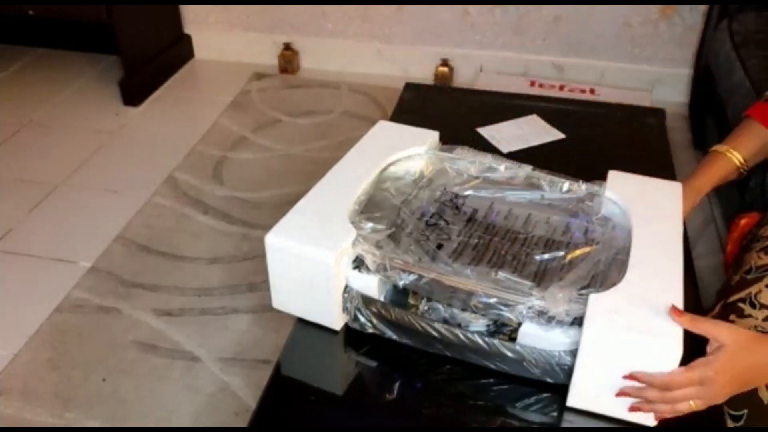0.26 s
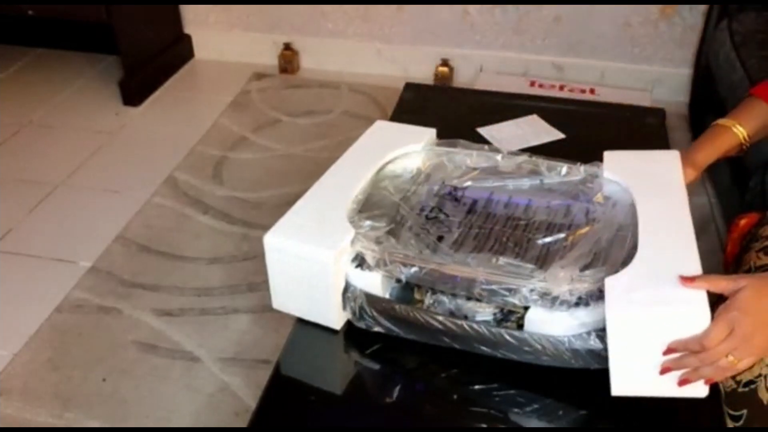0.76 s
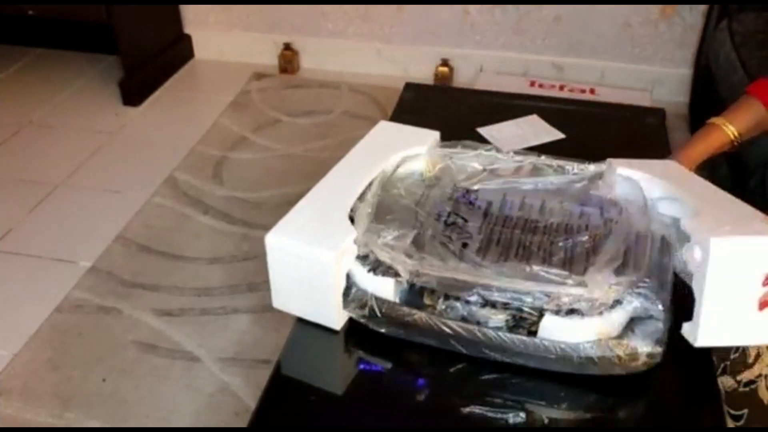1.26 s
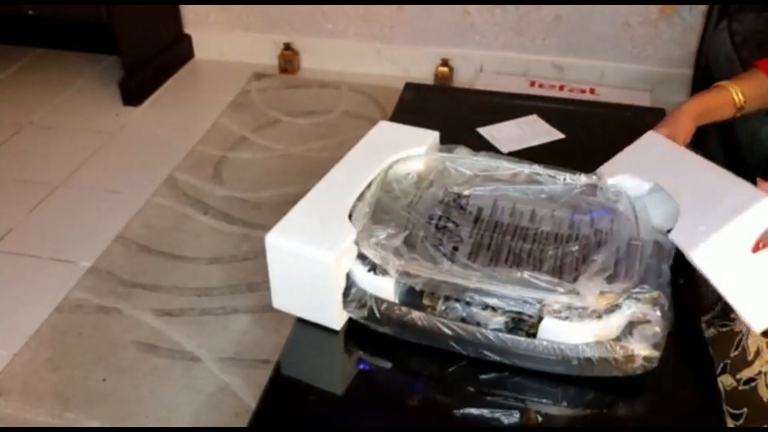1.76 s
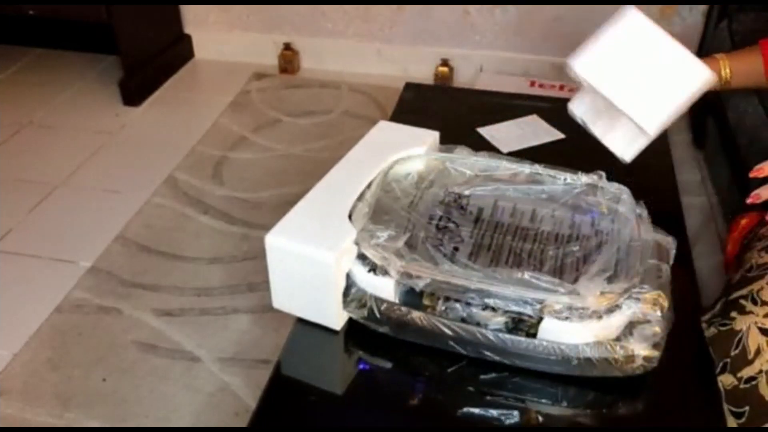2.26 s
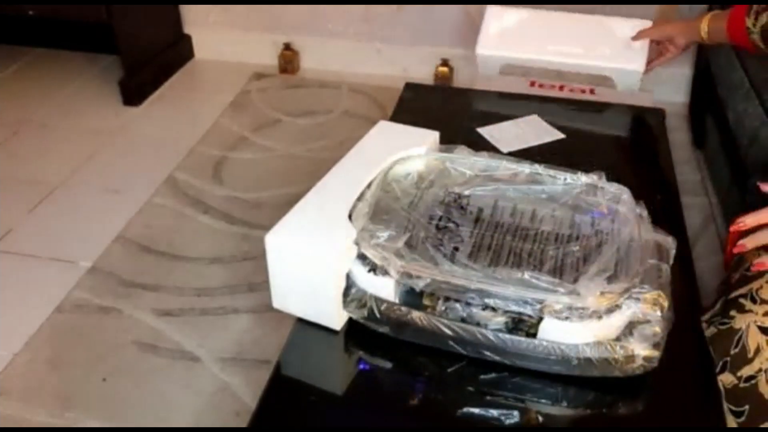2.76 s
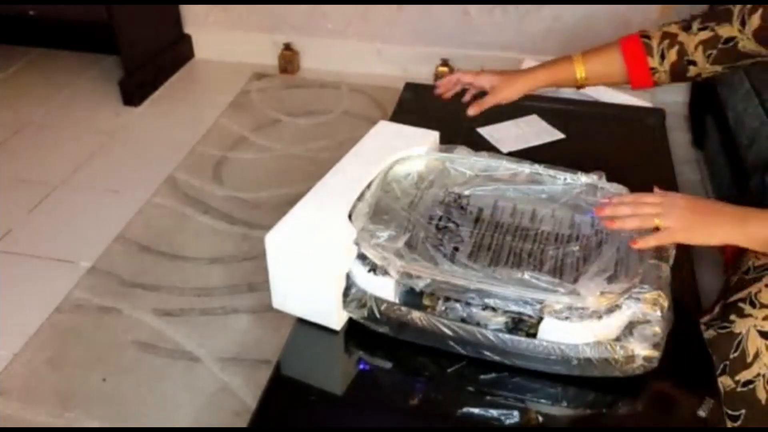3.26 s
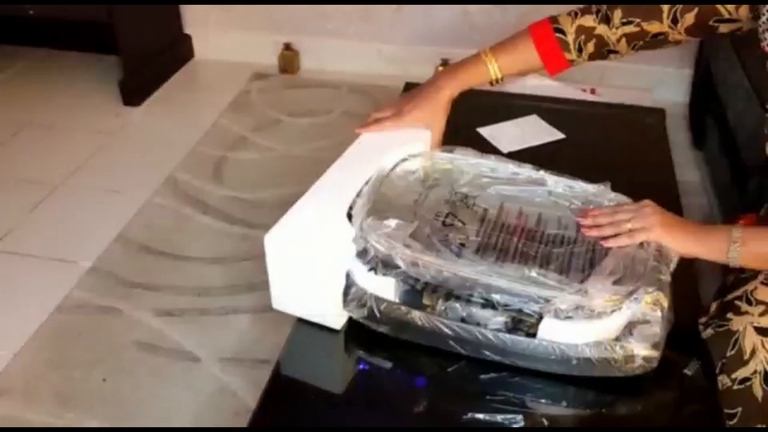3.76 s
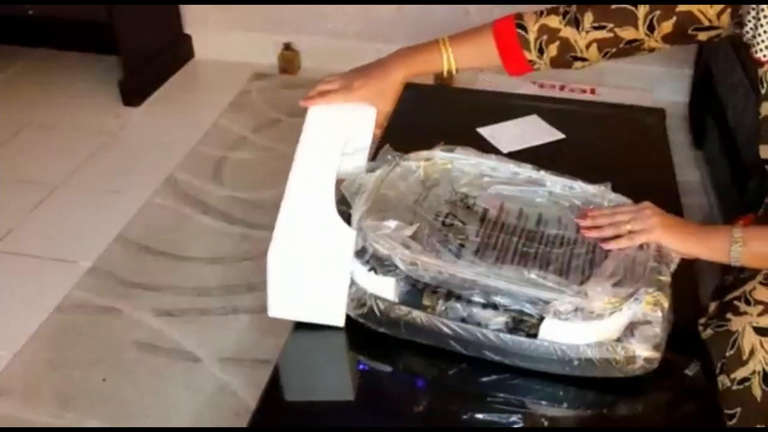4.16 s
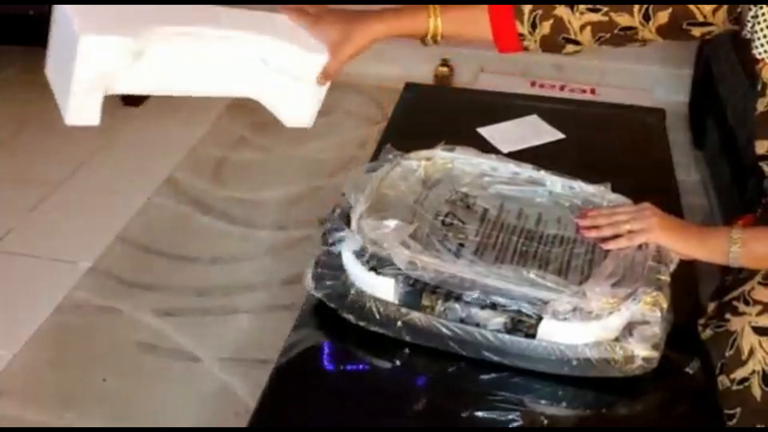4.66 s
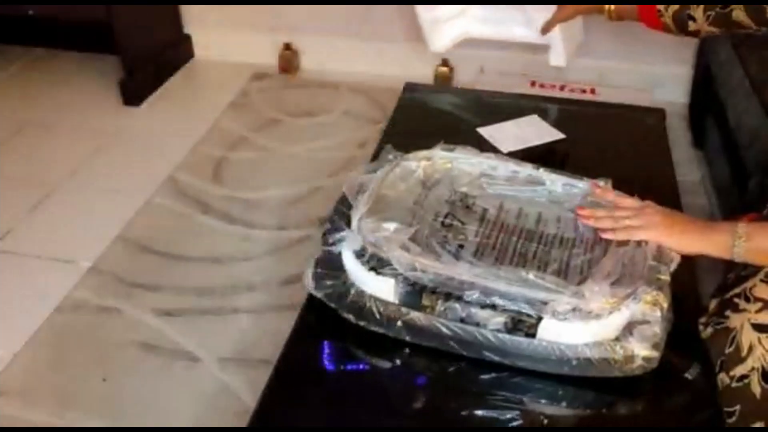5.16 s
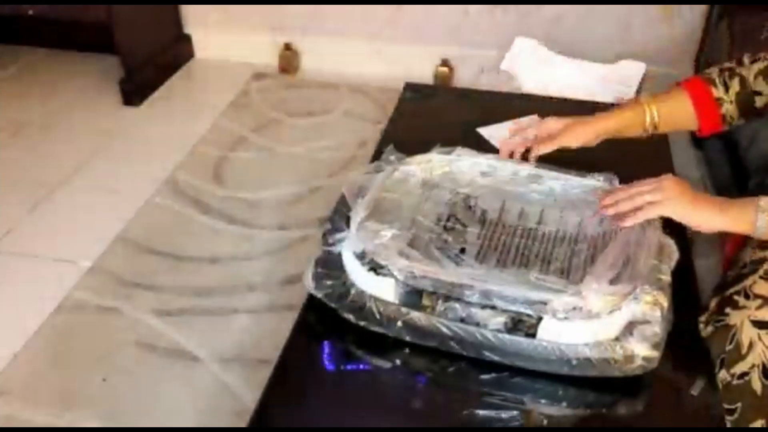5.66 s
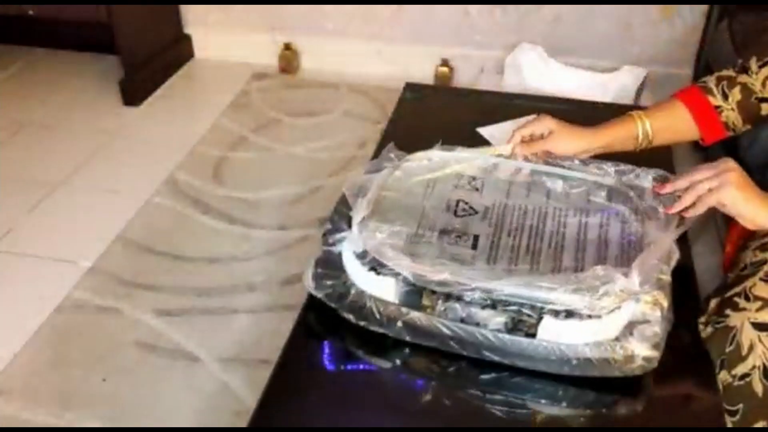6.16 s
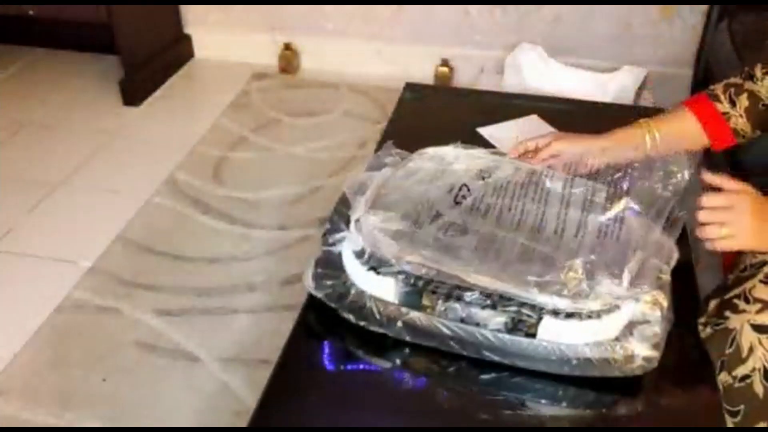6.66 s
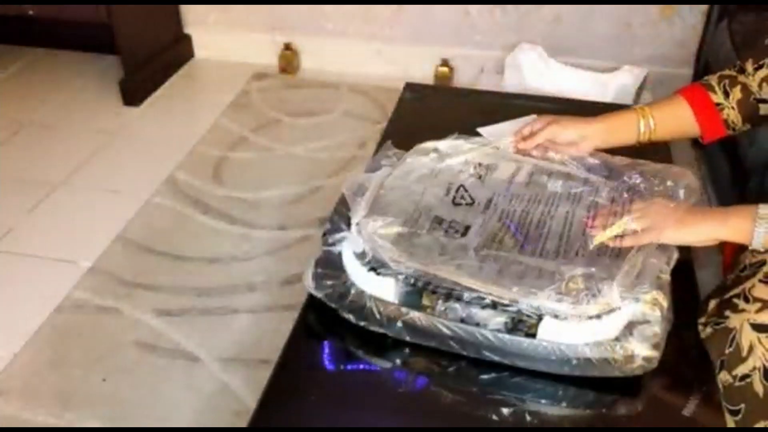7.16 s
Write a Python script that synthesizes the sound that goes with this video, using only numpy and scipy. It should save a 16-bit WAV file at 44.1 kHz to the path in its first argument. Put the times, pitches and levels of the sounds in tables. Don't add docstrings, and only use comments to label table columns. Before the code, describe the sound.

In a hard tiled room with a faint distant motor hum, hands tug a foam block from a plastic-wrapped appliance with light crackles, a tiny squeak and sharp snaps. It drops with a hollow knock and small bounces. A second block comes off with harder tugs, lands louder, then the loose wrap rustles. Close stereo pickup, top end cut.

```python
import sys
import numpy as np
from scipy import signal
from scipy.fft import rfft, irfft
from scipy.io import wavfile

SR = 44100
rng = np.random.default_rng(int(sys.argv[2]) if len(sys.argv) > 2 else 0)


def boost(x):
    u = np.asarray(x, float) / 20
    return 10 ** u


def transcribe(u):
    v = np.clip(np.atleast_2d(u).T, -1, 1)
    q = np.round(v * 32767).astype(np.int16)
    wavfile.write(sys.argv[1], SR, q)


N = 327222

# f/Hz, level/dB
AIR_COLOUR = [(15, -30), (25, 5.5), (56, -5.5), (97, -9), (157, -5), (201, -7.5), (271, 8), (334, -12.5),
              (579, -8), (728, -13.5), (1260, -20), (4350, -32.5), (6000, -94), (7800, -19), (13200, -120)]
AIR_DB = -48
# f/Hz, level/dB rms
MOTOR_TONES = [(47.5, -56.5), (95, -65.5), (142, -68), (190, -60)]
# f/Hz, likeness/0..1
PORT_LIKENESS = [(60, 0.91), (250, 0.94), (600, 0.54), (1400, 0.043), (3000, 0.043), (7000, 0.6),
                 (14000, 0.97)]
# f/Hz, t60/s
ROOM_FADE = [(60, 0.87), (200, 0.46), (500, 0.51), (1500, 0.47), (4000, 0.41), (8000, 0.39), (14000, 0.27)]
# t/s, hold/s, crackle level/dB, rub level/dB, crackle brightness/dB
RIGHT_PULLS = [(0.189, .03, -53.5, -57, -7), (.255, 0.025, -51.5, -57, -5), (0.335, 0.025, -53, -71, -1),
               (0.457, 0.2, -57, -62.5, -5), (0.577, 0.033, -50.5, -55.5, -4),
               (0.666, 0.23, -62.5, -62.5, 0), (0.865, 0.034, -53, -55, -7), (0.997, .02, -55, -53.5, -4),
               (1.018, 0.17, -49, -54, -8), (1.165, .02, -46, -45.5, 0), (1.194, 0.037, -46.5, -42.5, 1),
               (1.243, 0.085, -45, -49, -7), (1.36, 0.23, -52.5, -53.5, -1.5),
               (1.633, 0.17, -48.5, -55, -1.5), (1.79, 0.071, -41, -51, -4), (1.991, 0.039, -67, -56, 1),
               (2.07, 0.15, -63, -66, -5), (2.186, 0.087, -54, -58, -10), (2.372, 0.16, -57.5, -60, -4),
               (2.766, .02, -54, -62, -11), (2.796, 0.058, -50, -61.5, -12), (3.012, .06, -59, -54, 2.5),
               (3.11, 0.045, -52.5, -53, 2.5), (3.2, 0.03, -54, -59, -2)]
LEFT_PULLS = [(3.542, 0.16, -58.5, -63.5, -2), (3.68, 0.05, -48.5, -50, -0.5), (3.78, 0.25, -51, -59, -8),
              (3.923, 0.064, -31.5, -37, -9.5), (4.079, 0.082, -42.5, -46, -4.5),
              (4.241, 0.057, -35, -42, -10), (4.326, 0.043, -32.5, -40.5, -10),
              (4.4, 0.098, -39, -46.5, -10.5), (4.54, 0.056, -38.5, -43, -22),
              (4.65, 0.041, -50.5, -55, -8), (4.883, 0.33, -58.5, -58.5, -2), (5.1, 0.1, -53.5, -59, -3),
              (5.215, 0.039, -45.5, -53, -6), (5.42, 0.095, -51, -63, -5),
              (5.511, 0.017, -37.5, -32.5, -14), (5.6, 0.12, -53, -51, -6), (5.72, .1, -55.5, -58, -7)]
WRAP_PULLS = [(5.842, .17, -45, -53, -7), (6.03, .13, -46, -54, -6.5), (6.19, .1, -52, -56, -6),
              (6.31, 0.015, -43, -53.5, -21), (6.37, .13, -45.5, -56, -10.5),
              (6.569, 0.13, -47.5, -57.5, -6.5), (6.74, 0.12, -57.5, -67, -16), (6.9, .2, -59.5, -66, -13),
              (7.1, 0.086, -52.5, -61.5, -14), (7.18, 0.038, -47, -56.5, -14),
              (7.291, 0.17, -50.5, -62, -5.5)]
# f/Hz, level/dB per Hz
RUB_COLOUR = [(150, -36), (250, -16.5), (383, -7.5), (418, -13), (726, -14.5), (968, 9), (1070, -11.5),
              (5000, -21), (6500, -49), (11000, -120)]
# f/Hz, level/dB per Hz
WRAP_COLOUR = [(880, -32), (1500, -25.5), (3170, 6), (5470, -7), (7220, 0), (9900, -7), (13700, 4),
               (14800, -9)]
# t/s, peak level/dB, centre f/Hz
CREASE_SNAPS = [(0.1842, -35.5, 7850), (0.868, -42, 6740), (0.9043, -38.5, 10800), (0.9787, -29.5, 6700),
                (1.121, -36.5, 7240), (1.178, -37, 6970), (1.2692, -29, 5000), (1.569, -47, 6820),
                (1.798, -20, 8860), (1.8012, -18, 13100), (1.8108, -20, 13600), (2.001, -43, 3830),
                (2.203, -39, 7040), (2.375, -52, 3630), (3.5477, -48, 6940), (3.861, -31.5, 7570),
                (3.925, -20, 3500), (4.082, -29, 3400), (4.2454, -29, 3400), (4.884, -42.5, 7570),
                (5.103, -36, 7100), (5.157, -37.5, 7010), (5.8748, -31.5, 7260), (5.921, -30.5, 7750),
                (6.201, -34, 7390), (6.312, -31, 8500), (6.613, -39, 7420), (6.903, -43, 7770),
                (7.1015, -48, 3200), (7.1985, -39, 6500)]
# t/s, f/Hz, level/dB
SQUEAK_PATH = [
    (.539, 5800, -53),
    (.546, 6030, -42),
    (.552, 6660, -40.5),
    (.562, 6930, -29),
    (.569, 7880, -32),
    (.578, 8940, -38),
    (.584, 9000, -64),
]
# t/s, peak level/dB, thud f/Hz, bright edge level/dB, ring level/dB
FOAM_BUMPS = [
    (0.278, -43.5, 657, -21, -22),
    (1.2, -30.5, 237, -24, -9.5),
    (1.268, -35.5, 400, -27, -22),
    (1.826, -30, 330, -16, -9),
    (1.881, -41, 285, 7.5, -9),
    (3.68, -47, 210, -21, -23),
    (3.893, -23.5, 227, -9, -4.5),
    (4.298, -22, 215, -19, -5.5),
    (7.389, -40, 460, 3, -19),
]
FIRST_FALL = [
    (3.009, -22, 220, -36, -5),
    (3.033, -22, 256, -37, -12),
    (3.094, -14, 397, -38, 5.5),
    (3.174, -33, 330, -29, 1.5),
    (3.234, -34, 335, -25, 0),
]
SECOND_FALL = [
    (5.463, -23.5, 226, -23, 0.5),
    (5.509, -10.5, 348, -3.5, -1.5),
    (5.564, -25, 294, -25, -5),
    (5.609, -22.5, 336, -30, -0.5),
    (5.833, -23.5, 560, -12, -5),
    (5.898, -34, 376, -13, -8),
]
# f/Hz, level/dB, t60/s
FIRST_TONES = [(58, -19, 0.15), (92.7, -15, 0.24), (153.6, -5.5, 0.088), (205, -18, 0.25),
               (322.3, 1.5, 0.23), (366.4, -1, 0.21), (479.6, 2, 0.18), (557, 2, 0.083), (634.4, 0.5, 0.15),
               (702.4, 2, 0.13), (774, -1.5, 0.14)]
# f/Hz, level/dB, t60/s
SECOND_TONES = [(90.5, -11, 0.18), (156.7, -3.5, 0.19), (202.3, 0.5, 0.15), (329, -2, 0.25),
                (382, -7.5, 0.28), (470.7, -8.5, 0.18), (651, 6, 0.052), (664, -10, 0.13),
                (906, 7.5, 0.064), (1166, -8, 0.13), (1320, -24, .08)]
# t/s, delay/samples
LEFT_DELAY = [
    (0, 7),
    (2.4, 7),
    (3.3, 5),
    (3.6, -1),
    (4.8, -5),
    (5.2, 4),
    (5.5, 7),
    (6.1, 4),
    (7.42, 4),
]
# f/Hz, level/dB
PORT_BALANCE = [(60, 3), (110, -1), (200, 0.5), (370, 0.0), (690, 0.0), (1270, 0), (2330, -0.5), (4290, 1),
                (7890, -1.5), (14500, -3.5)]
# f/Hz, level/dB
CAPSULE_TONE = [(20, -16), (40, 2.5), (5000, -1), (6500, 2.5), (8300, -0.5), (8900, -5), (11000, -2.5),
                (14250, 3), (14500, -27), (14900, -48), (15100, -85)]

ATTACK_DB_PER_S, RELEASE_DB_PER_S = 800, 143
RISE_S = .008
REST_CRACKLE_DB, REST_RUB_DB = -79, -71
SPLIT_HZ = 8700
SNAP_SIDE_DB = 3
CONTACT_S, CONTACT_DOUBLES_DB = .016, 22


def rms_one(x):
    return x / np.sqrt(np.mean(x ** 2) + 1e-20)


def in_time(rows):
    s, *columns = np.transpose(rows)
    return [np.interp(np.arange(N) / SR, s, c) for c in columns]


def at_hz(points, hz):
    table_hz, values = np.array(points).T[:2]
    return np.interp(np.log(hz), np.log(table_hz), values)


def drift(rate):
    r = np.exp(-80 * np.pi * rate / SR)
    white = rng.standard_normal(N // 40 + 2002)
    slow = signal.lfilter([1], [1, -2 * r, r * r], white)[2000:]
    return np.interp(np.arange(N) / 40, np.arange(len(slow)), rms_one(slow))


def patches(rate):
    return 2.0 * drift(rate)


def passed(x, hz, kind, order=2):
    return signal.sosfilt(signal.butter(order, hz, kind, fs=SR, output="sos"), x)


def ring(x, hz, t60):
    r = boost(-60 / (t60 * SR))
    w = 2 * np.pi * hz / SR
    return signal.lfilter([0, np.sin(w)], [1, -2 * r * np.cos(w), r * r], x)


def bands(white, low_hz, gain):
    out = 0
    edges = low_hz * 2 ** np.arange(0, np.log2(20000 / low_hz), .5)
    for k, (low, high) in enumerate(zip(edges, edges[1:])):
        centre = np.sqrt(low * high)
        mid, side = passed(white[k % 2], [low, high], "band")
        alike = np.clip(at_hz(PORT_LIKENESS, centre), 0, 1)
        both = np.sqrt(1 + alike) * mid + np.sqrt(1 - alike) * side * [[1], [-1]]
        out = out + gain(centre) * both
    return rms_one(out)


def grains(per_s, spread_db, smooth):
    sizes = boost(spread_db * np.minimum(rng.exponential(1, (2, 2, N)), 4))
    white = rng.standard_normal((2, 2, N))
    happens = rng.random(N) < per_s * boost(4.0 * drift(15)) / SR
    return smooth * white + rms_one(sizes * np.sign(white) * happens)


def background():
    white = rng.standard_normal((2, 2, N))
    air = bands(white, 23.0, lambda hz: boost(at_hz(AIR_COLOUR, hz) + 0.33 * drift(9.6)) * (hz < 8000))
    turn = np.cumsum(1 + 0.00987 * drift(2.97)) / SR
    hum = sum(boost(db + 1 + patches(7.6)) * np.sin(2 * np.pi * hz * turn) for hz, db in MOTOR_TONES)
    return boost(AIR_DB - 5.5) * air + hum


def room(x):
    t = np.arange(SR) / SR
    white = rng.standard_normal((2, 2, SR))
    tail = bands(white, 40, lambda hz: boost(-60 * t / at_hz(ROOM_FADE, hz)))
    tail = rms_one(tail * (1 - np.exp(-t / 0.00067))) / np.sqrt(SR)
    return signal.fftconvolve(x[None], tail, axes=1)[:, :N]


def handling():
    t = np.arange(0, N + 64, 64) / SR
    pulls = RIGHT_PULLS + LEFT_PULLS + WRAP_PULLS
    s, hold, crackle_db, rub_db, bright_db = np.transpose(pulls)[..., None]
    rise_db = np.minimum(ATTACK_DB_PER_S * (t - s - RISE_S), 0)
    fall_db = RELEASE_DB_PER_S * np.maximum(t - s - hold, 0)
    layers = [(crackle_db, REST_CRACKLE_DB),
              (crackle_db + bright_db, REST_CRACKLE_DB + 1.0),
              (rub_db, REST_RUB_DB)]
    gains = []
    for db, rest_db in layers:
        power = (boost(db + rise_db - fall_db) ** 2).sum(axis=0) + boost(rest_db) ** 2
        gains.append(np.interp(np.arange(N) / SR, t, np.sqrt(power)))
    return gains


def foam_rub(strength):
    clicks = grains(600, 5.8, smooth=2.0)
    rub = bands(clicks, 230.0, lambda hz: boost(at_hz(RUB_COLOUR, hz) + patches(10.1)) * (hz < 6000))
    return strength * rub


def wrap_crackle(strength, bright):
    clicks = grains(1300, 8.2, smooth=2.7)
    wrap = bands(clicks, 1161, lambda hz: boost(at_hz(WRAP_COLOUR, hz) + patches(22.4)))
    body = passed(wrap, SPLIT_HZ, "low", order=4)
    top = passed(wrap, SPLIT_HZ, "high", order=4)
    return strength * body + boost(1.5) * bright * top


def snaps():
    out, t = np.zeros((2, N + SR)), np.arange(2000) / SR
    sides = SNAP_SIDE_DB * np.array([[-1], [1]])
    for s, db, hz in CREASE_SNAPS:
        burst = rng.standard_normal(len(t)) * np.exp(-t / .0015)
        click = passed(burst, [hz / 1.9, min(hz * 2.1, 20000)], "band", order=1)
        start = round(s * SR)
        out[:, start:start + len(t)] += boost(db - 3 + sides) * click / abs(click).max()
    return out[:, :N]


def squeak():
    hz, db = in_time(SQUEAK_PATH)
    t, out = np.arange(N) / SR, 0
    for spot, spot_db in [(1, -2), (.93, -8), (1.1, -4.5)]:
        phase = 2 * np.pi * np.cumsum(spot * hz * (1 + .018 * drift(400))) / SR
        grip = boost(db + spot_db + 4.5 * drift(300))
        out = out + grip * (np.sin(phase) + boost(-2.5) * np.sin(2 * phase))
    return out * ((t > SQUEAK_PATH[0][0]) & (t < SQUEAK_PATH[-1][0]))


def knocks(rows, tones):
    out, t = np.zeros(N + SR), np.arange(SR // 2) / SR
    for s, db, thud_hz, edge_db, ring_db in rows:
        contact = CONTACT_S * 2 ** ((db + 21) / CONTACT_DOUBLES_DB)
        crush = rng.standard_normal(len(t))
        shape = np.exp(-t / np.clip(contact, .002, .08)) * (1 - np.exp(-t / .004))
        thud = passed(crush * shape, [thud_hz / 2.33, thud_hz * 1.8], "band")
        push = passed((t == 0) * 1., 1.38 * thud_hz, "low")
        rung = sum(boost(tone_db) * ring(push, hz, t60) for hz, tone_db, t60 in tones)
        rung = rung * (1 - np.exp(-t / 0.0088))
        edge = passed(crush * np.exp(-t / .011), 750, "high")
        edge = passed(edge, 1600, "low", order=3)
        hit = thud / abs(thud).max()
        hit = hit + boost(ring_db) * rung / abs(rung).max()
        hit = hit + boost(edge_db) * edge / abs(edge).max()
        start = round(s * SR)
        out[start:start + len(t)] += boost(db - 2.5) * hit
    return out[:N]


def scene():
    crackle, bright, rubbing = handling()
    wrap = wrap_crackle(crackle, bright)
    rub = foam_rub(rubbing)
    ticks, whistle = snaps(), squeak()
    hits = knocks(FOAM_BUMPS, SECOND_TONES)
    hits = hits + knocks(FIRST_FALL, FIRST_TONES) + knocks(SECOND_FALL, SECOND_TONES)
    wet = room(boost(1.5) * hits + boost(5.5) * ticks.mean(axis=0) + boost(-5.0) * whistle)
    near = boost(1.0) * hits + boost(4.0) * ticks + whistle * boost(np.array([[-2.5], [-1.5]]))
    return near + wet + boost(-2.5) * wrap + boost(4.0) * rub + background()


def top_cut(x):
    return signal.sosfilt(signal.butter(12, 15110, fs=SR, output="sos"), x)


def record(dry):
    hz = np.arange(N // 2 + 1) * SR / N + 1
    tilt = boost(at_hz(PORT_BALANCE, hz) / 2)
    tone = rfft(dry) * boost(at_hz(CAPSULE_TONE, hz)) * [tilt, 1 / tilt]
    lower = 1 / (1 + (hz / 4600) ** 6)
    low = irfft(tone * lower, N)
    high = irfft(tone * (1 - lower), N)
    late = np.interp(np.arange(N) - in_time(LEFT_DELAY)[0], np.arange(N), low[0])
    return top_cut(high + [late, low[1]])


dry = scene()
out = record(dry)
transcribe(out)
```